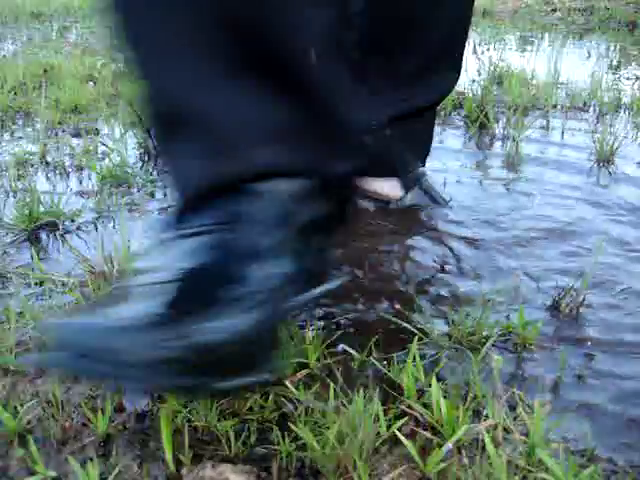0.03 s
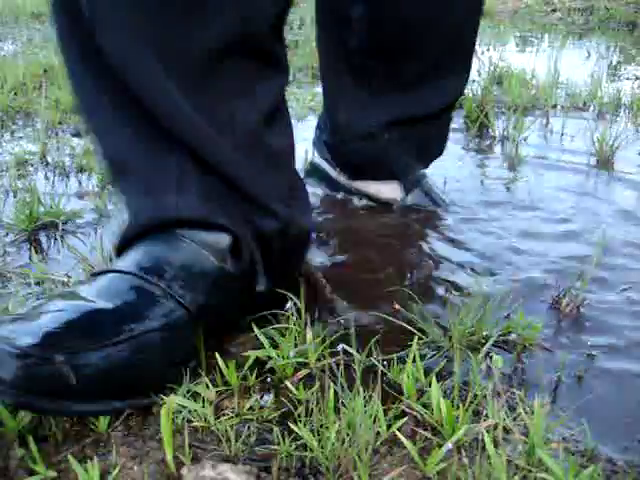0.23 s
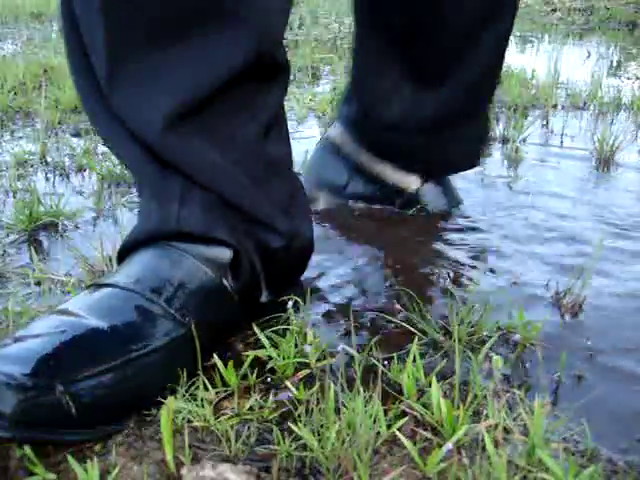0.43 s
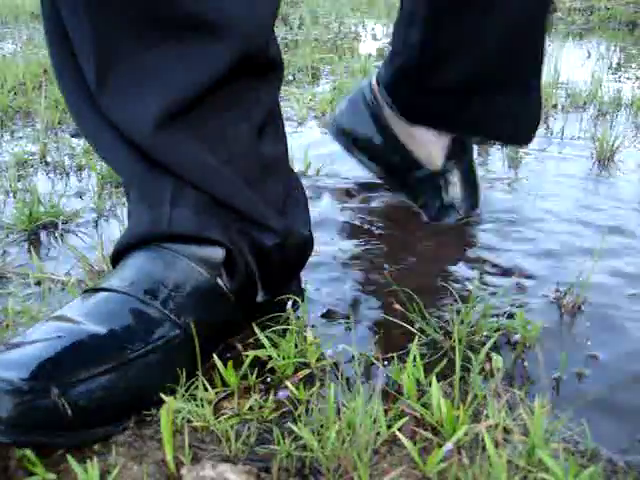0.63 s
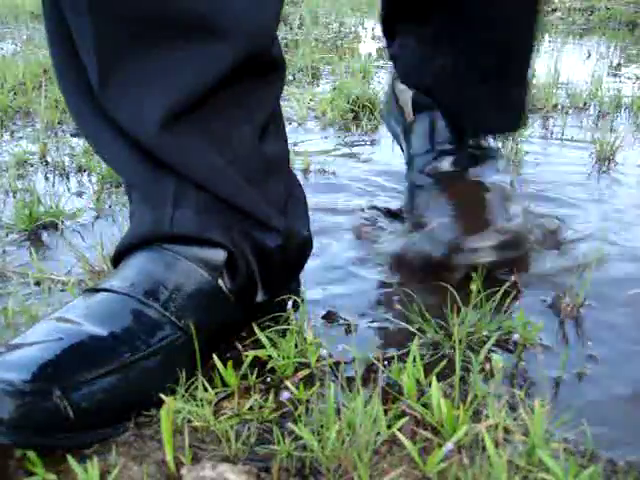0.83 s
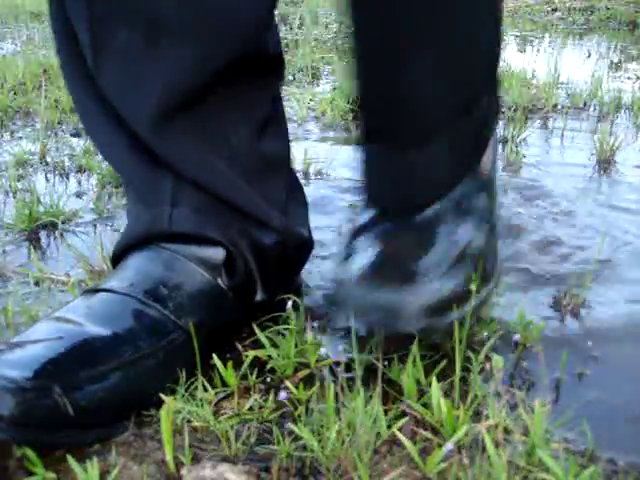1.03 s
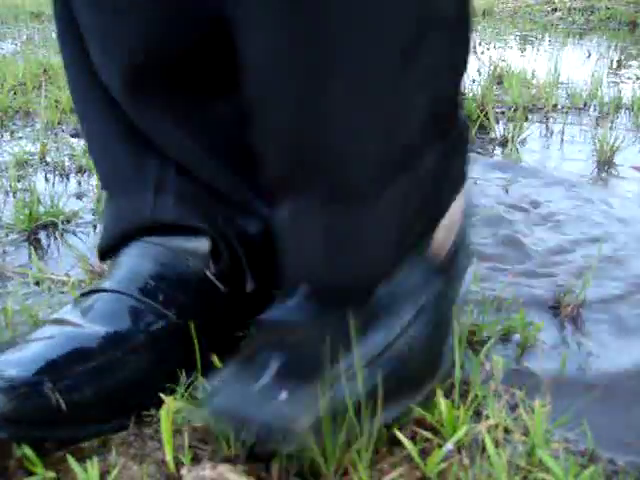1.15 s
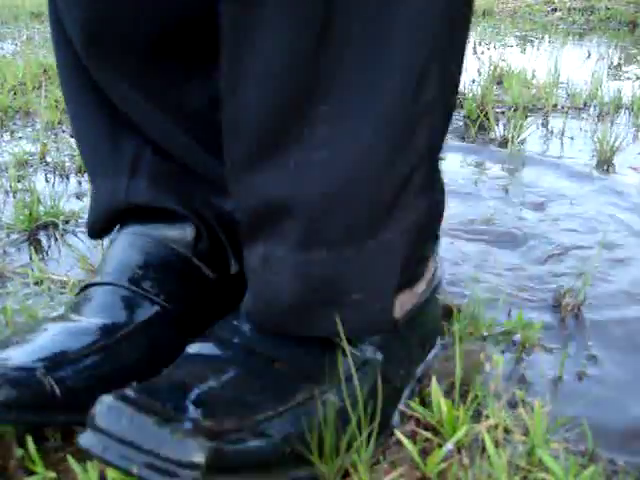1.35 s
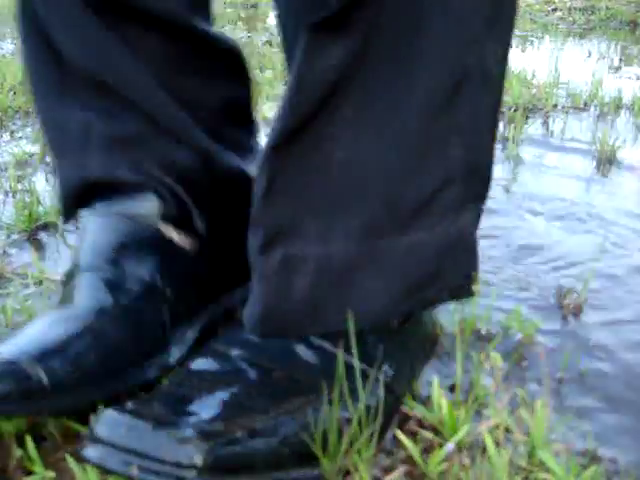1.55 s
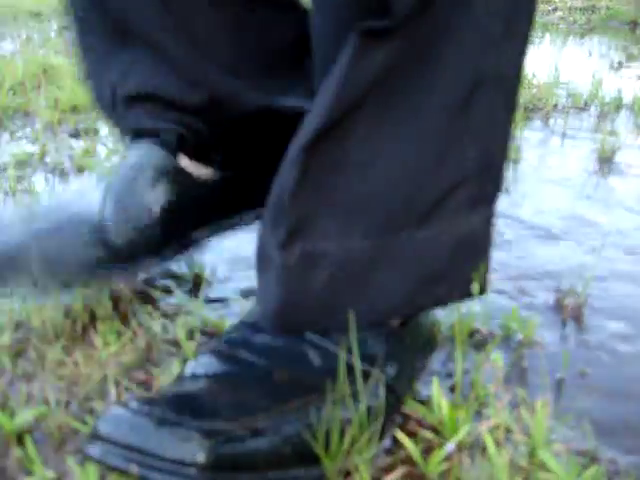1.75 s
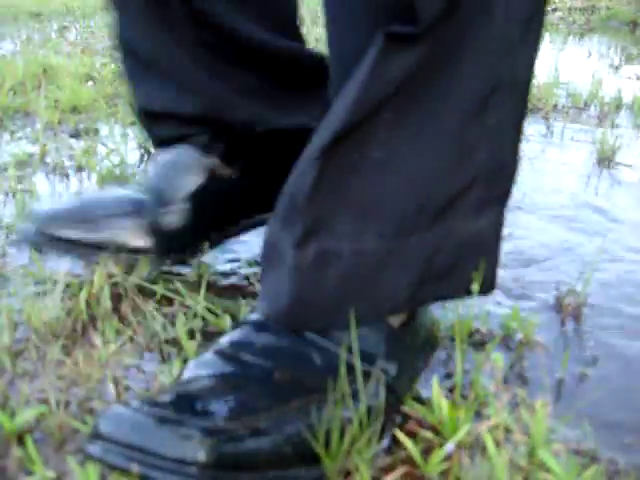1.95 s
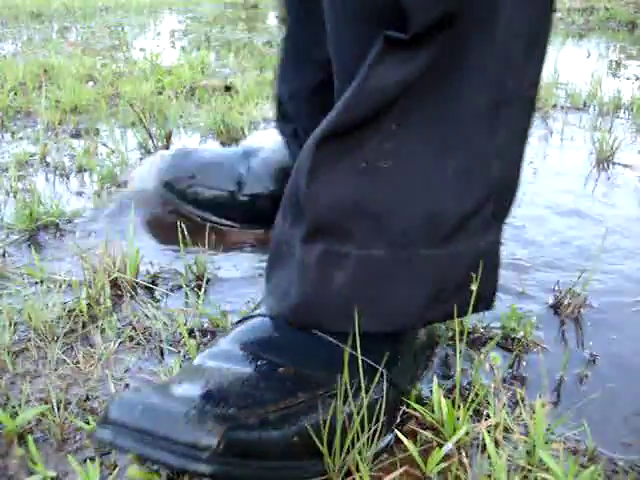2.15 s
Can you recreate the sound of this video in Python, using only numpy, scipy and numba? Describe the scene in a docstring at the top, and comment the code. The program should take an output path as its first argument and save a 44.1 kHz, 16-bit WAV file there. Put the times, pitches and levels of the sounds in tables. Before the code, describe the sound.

Shoes splash and squelch through a shallow puddle onto soggy grass, over faint hiss.

```python
"""Leather shoes wade out of a shallow muddy puddle onto soggy grass, close to the microphone.
Each push of a foot churns up tiny bubbles and spray, which ring as damped oscillators. Air pockets
resonate and pop, wet films and drops snap, feet thud in the turf and the hardest slaps bump the
microphone. Behind them a thin rising whistle, like a far bird, repeats over faint shrilling and hiss."""
import sys
import numpy as np
from scipy import signal
from scipy.fft import rfft, irfft
from scipy.io import wavfile
from scipy.ndimage import uniform_filter1d
from numba import njit

SR = 44100
rng = np.random.default_rng(int(sys.argv[2]) if len(sys.argv) > 2 else 0)


def generate_wav(sig):
    """Save sig (samples, or channels by samples) to the path in sys.argv[1] as 16-bit PCM at SR."""
    pcm = np.round(np.clip(np.atleast_2d(sig).T, -1, 1) * 32767).astype(np.int16)
    wavfile.write(sys.argv[1], SR, pcm)


N = 97020


def undb(db):
    """Amplitude grows tenfold for every 20 dB of level."""
    return 10 ** (np.asarray(db) / 20)


def unit_rms(x):
    """Dividing by the root mean square gives a signal unit power."""
    return x / np.sqrt(np.mean(x ** 2))


def add(out, start_s, x):
    """Superposition: a sound adds to those already present."""
    i = max(int(start_s * SR), 0)
    out[i:i + len(x)] += x[:max(N - i, 0)]


def wander(rate_hz):
    """Two moving averages low-pass white noise into a smooth drift of unit rms."""
    span = max(int(SR / rate_hz), 1)
    smoothed = uniform_filter1d(rng.standard_normal(N), span, mode="wrap")
    return unit_rms(uniform_filter1d(smoothed, span, mode="wrap"))


def colour(x, gain):
    """Zero-phase filtering: the spectrum is multiplied by a real gain(Hz)."""
    hz = np.maximum(np.fft.rfftfreq(len(x), 1 / SR), 1)
    return irfft(rfft(x) * gain(hz), len(x))


def reflections(x, decay_s):
    """Diffuse scattering: many weak echoes act as convolution with a decaying noise."""
    t = np.arange(SR // 4) / SR
    tail = rng.standard_normal(len(t)) * np.exp(-t / decay_s) * (1 - np.exp(-t / 0.0067))
    return signal.fftconvolve(x, tail / np.sqrt(np.sum(tail ** 2)))[:N]


def hiss():
    """Outdoor hiss is broadband noise, here densest in the high treble and flickering in level."""
    # Each row: frequency in Hz, relative spectral density in dB.
    spectrum = [(25, 10.5), (70, 1), (160, 6.5), (400, 5), (1000, -2.5), (2200, 1.5), (2900, -2.5),
                (3400, -25), (3900, -2), (5500, -6), (7200, -5.5), (7900, 8), (8700, -9.5), (9600, 15.5),
                (10200, -8)]
    hz, db = np.array(spectrum).T
    noise = colour(rng.standard_normal(N), lambda f: undb(np.interp(np.log(f), np.log(hz), db)))
    return unit_rms(noise) * undb(-48 + 2.77 * wander(rate_hz=24))


def shrill():
    """Narrow-band noise under random amplitude modulation is heard as far-off shrilling."""
    centre_hz, half_width_hz = 3440, 240
    band = colour(rng.standard_normal(N), lambda f: 1 / (1 + ((f - centre_hz) / half_width_hz) ** 2))
    return unit_rms(band) * undb(-61 + 5 * wander(rate_hz=8.2))


def whistles():
    """Frequency modulation: each far whistle is a sine that glides upward and wavers a little."""
    # Each row: start in seconds, length in seconds, first and last pitch in Hz, level in dB.
    glides = [(0.186, .10, 3930, 5160, -45.5), (1.071, 0.053, 4170, 5520, -39.5),
              (1.157, 0.036, 5350, 6220, -34), (1.854, 0.19, 4455, 6200, -41.5)]
    out = np.zeros(N)
    waver = 1 + 0.013 * wander(rate_hz=330)
    flutter = undb(1.9 * wander(rate_hz=120))
    for start, length, from_hz, to_hz, db in glides:
        progress = np.linspace(0, 1, int(length * SR))
        part = slice(int(start * SR), int(start * SR) + len(progress))
        hz = (from_hz + (to_hz - from_hz) * progress) * waver[part]
        envelope = np.sqrt(np.abs(np.sin(np.pi * progress))) * flutter[part]
        add(out, start, undb(db) * envelope * np.sin(2 * np.pi * np.cumsum(hz) / SR))
    return out


def turf_thuds():
    """A soft impact excites only low frequencies: a foot in turf gives a Gaussian pulse of bass."""
    # Each row: centre in seconds, frequency in Hz, peak in dB, half-length in seconds.
    footfalls = [(.005, 75, -45.5, .014), (.087, 70, -31, 0.015), (.14, 55, -50, 0.013),
                 (.235, 70, -38.5, 0.0092), (1.163, 55, -55, .014)]
    t = np.arange(N) / SR
    return sum(undb(db) * np.exp(-((t - centre) / half) ** 2) * np.cos(2 * np.pi * hz * (t - centre))
               for centre, hz, db, half in footfalls)


def microphone_bumps():
    """The hardest slaps send the microphone a pressure pulse: a fast push, then a shallow undershoot."""
    # Each row: start in seconds, level in dB.
    pulses = [(0.2662, -19), (0.2783, -23.5), (0.462, -19.5), (.784, -19.5), (1.34, -27.5), (1.348, -26),
              (1.633, -26)]
    rise_s, decay_s = 0.00057, 0.015
    out, t = np.zeros(N), np.arange(SR // 2) / SR
    pressure = (1 - np.exp(-t / rise_s)) * np.exp(-t / decay_s) * (1 - t / decay_s)
    for start, db in pulses:
        add(out, start, undb(db) * pressure)
    return out


def film_snaps():
    """A brief event has a broad spectrum: wet films and drops snap in short bursts of noise."""
    # Each row: time in seconds, peak in dB, band centre in Hz, bandwidth in octaves.
    cracks = [(0.224, -13, 2200, 1.5), (0.2325, -14, 2300, 2.2), (0.2665, -7.5, 6800, 2.2),
              (0.2787, -6, 5200, 1.9), (0.286, -23, 5000, 2), (0.2995, -22, 1500, 2.8),
              (.3052, -16.5, 3500, 1.6), (0.3745, -30, 7000, 1.5), (0.3839, -19, 5000, 0.87),
              (0.4186, -16, 3400, 2), (0.534, -18, 7000, 1.7), (0.566, -21, 7000, 1.6),
              (0.5753, -14, 7800, 0.61), (.580, -14.5, 6500, 0.81), (.683, -27, 5000, 1.3),
              (0.7285, -17, 4500, 0.89), (0.7318, -10, 7000, 2.5), (0.7831, -13, 3800, 1.5),
              (0.7883, -12, 4500, 3.6), (0.9286, -14, 4500, 0.93), (0.935, -16, 5000, 2.1),
              (.946, -21, 4800, 0.79), (.952, -24, 7000, 1.5), (1.0497, -23, 3500, 2.5),
              (1.279, -23.5, 3560, 1.6), (1.3397, -6.5, 4000, 0.67), (1.344, -9, 1100, 5.7),
              (1.3496, -11, 8200, 0.27), (1.3538, -6, 2090, 2.6), (1.4639, -16.5, 2500, 1.7),
              (1.4717, -17, 4800, 2.2), (1.494, -23.5, 2600, 0.5), (1.6167, -22, 6100, 0.35),
              (1.6322, -15.5, 3400, 2.3), (1.656, -36, 4700, 1.1), (1.691, -32, 2000, 2.5)]
    out, t = np.zeros(N), np.arange(SR // 20) / SR
    decay_s, lead_s = 0.00095, t[len(t) // 2]  # the lead leaves room for the filter to spread the burst
    for at, db, hz, octaves in cracks:
        burst = rng.standard_normal(len(t)) * (t >= lead_s) * np.exp(-np.abs(t - lead_s) / decay_s)
        band = colour(burst, lambda f: 1 / (1 + (2 * np.log2(f / hz) / octaves) ** 2))
        crack = colour(band, lambda f: 1 / np.sqrt(1 + (hz / f / 10) ** 2))  # bass roll-off
        add(out, at - lead_s, undb(db) * crack / np.abs(crack).max())
    return out


def pocket_pops():
    """Air pockets resonate until they burst, most of them rising in pitch as they surface."""
    # Each row: start in seconds, pitch in Hz, level in dB, decay time in seconds,
    # glide per second as a share of the starting pitch.
    pockets = [(.374, 439, -27, 0.028, 4.5), (0.415, 905, -14.5, .004, -11),
               (0.424, 251.6, -19.5, 0.021, 1.5), (.437, 451, -17, .012, 4.5), (.590, 600, -2, 0.001, 7),
               (.608, 603, -20, 0.0017, 5), (.671, 553, -28, 0.0055, -5), (0.7296, 500, -15, 0.0068, 0),
               (0.783, 4670, -14, .002, -7), (0.7843, 1495, -4, 0.0018, -20),
               (0.787, 1435, -4.5, 0.0024, 1), (0.7887, 1420, -8, 0.0017, 23), (0.81, 482, -28, 0.028, 4.5),
               (.812, 3585, -38, 0.021, 3), (.818, 760, -27.5, 0.023, 12.5), (.866, 578, -32, 0.02, 3),
               (.901, 558, -28, 0.0097, 12), (.922, 913, -25.5, 0.0076, -0.5),
               (0.947, 1574, -29, 0.0058, 5.5), (0.966, 1470, -28, .007, 13.5),
               (.979, 2120, -30.5, 0.0057, 7), (1.049, 1350, -26.5, 0.0057, 4),
               (1.0615, 850, -23.5, 0.012, 8.5), (1.082, 1200, -29.5, 0.0078, 35.5),
               (1.109, 1013, -34.5, 0.007, 7), (1.159, 1210, -15, 0.001, 9), (1.198, 880, -12.5, 0.002, -1),
               (1.214, 1120, -12, 0.0025, 12), (1.2185, 840, -13, 0.0046, -0.5),
               (1.218, 1360, -19, 0.0061, -0.5), (1.279, 3350, -16, 0.0026, 12),
               (1.333, 1564, -23.5, 0.0034, 5), (1.3391, 2150, -8.5, 0.0015, 18),
               (1.367, 3400, -20.5, 0.0023, 0), (1.437, 1410, -16, 0.0012, 24),
               (1.454, 2380, -29, 0.0045, 6), (1.471, 1190, -29.5, 0.018, 19.5),
               (1.511, 914, -35, 0.0081, 20), (1.591, 550, -19.5, 0.0016, 0),
               (1.6308, 2533, -3.5, 0.0024, 10), (1.6305, 5040, -12.5, 0.0022, 4),
               (1.631, 4260, -8, 0.0012, 4), (1.632, 2140, -4, 0.0016, 15), (1.6335, 1500, 2.5, 0.0012, -1),
               (1.634, 1277, -24.5, 0.0077, -1), (1.639, 2020, -19, 0.0034, -5)]
    attack_cycles, life_in_decays = 0.9, 2.67
    out, t = np.zeros(N), np.arange(SR // 10) / SR
    for start, hz, db, decay, glide in pockets:
        attack = 1 - np.exp(-(t * hz / attack_cycles) ** 2)
        fade = np.exp(-t / decay - (t / decay / life_in_decays) ** 4)
        tone = np.sin(2 * np.pi * hz * t * (1 + glide * t / 2))
        add(out, start, undb(db) * attack * fade * tone)
    return out


@njit
def ring_bubbles(start, hz, decay_cycles, amplitude):
    """Each bubble is a damped oscillator whose pitch rises as it dies away."""
    rise_per_decay = 0.12
    out = np.zeros(N)
    for k in range(len(start)):
        decay_samples = decay_cycles[k] * SR / hz[k]
        for i in range(min(int(6 * decay_samples), N - start[k])):
            age = i / decay_samples
            phase = 2 * np.pi * hz[k] / SR * i * (1 + rise_per_decay * age / 2)
            out[start[k] + i] += amplitude[k] * np.exp(-age) * np.sin(phase)
    return out


def bubble_stream(low_hz, high_hz, ring_scale, spread_db, count):
    """Many bubbles of random pitch, damping and strength merge into a band of noise."""
    when, pitch, length, strength = rng.random((count, 4)).T
    hz = low_hz * (high_hz / low_hz) ** pitch
    decay_cycles = ring_scale * (0.36 + length) / 2
    level_db = spread_db * np.minimum(-np.log(1 - strength), 4.2)  # capped exponential distribution
    stream = ring_bubbles((when * N).astype(np.int64), hz, decay_cycles, undb(level_db))
    stream = colour(stream, lambda f: 1 / np.sqrt(1 + (0.76 * low_hz / f) ** 6))  # high-pass
    local_power = uniform_filter1d(stream ** 2, int(0.022 * SR))
    even_flow = stream / np.sqrt(local_power + 1e-9)
    clumping = undb(1.5 * wander(rate_hz=170))
    return even_flow * clumping


def splashes():
    """Each push of a foot drives bubbles of four sizes; incoherent splashes add in power."""
    # Each row: crest time, swell and fade in seconds, then gurgle, squelch, spray and fizz in dB.
    pushes = [(.02, .04, 0.082, -60.5, -58, -49, -54.5), (.19, 0.024, 0.09, -57, -48.5, -50, -51.5),
              (.223, 0.0026, .016, -59, -33.5, -36.5, -41), (0.235, .002, 0.019, -49, -35, -32, -46),
              (.283, 0.013, 0.078, -41.5, -36, -37.5, -42.5), (0.373, 0.0027, 0.012, -36, -35, -48, -32.5),
              (0.399, 0.0039, 0.042, -29, -32, -37.5, -62), (0.418, 0.0023, .014, -28, -24.5, -28.5, -55),
              (0.442, 0.013, 0.017, -24.5, -25, -25.5, -37), (0.49, 0.018, 0.012, -52, -31.5, -35.5, -25.5),
              (.530, 0.059, 0.076, -43, -41.5, -42.5, -64), (0.565, 0.0013, 0.0065, -35, -45, -49, -33),
              (0.58, 0.0043, .014, -31.5, -38, -50, -49), (.610, 0.0027, 0.005, -29, -43, -64, -44),
              (.645, 0.015, .03, -52, -49.5, -63, -66), (0.671, 0.0011, 0.015, -39, -40.5, -52, -54),
              (0.707, 0.012, 0.02, -37.5, -45, -48, -69), (0.735, 0.011, 0.012, -28.5, -40, -42.5, -61),
              (.778, 0.0014, 0.025, -38, -28, -41, -38), (0.813, 0.0039, 0.022, -63, -31.5, -34.5, -41.5),
              (0.853, 0.014, 0.038, -57, -38.5, -45.5, -59), (.902, .002, 0.015, -67, -34, -53, -55),
              (.955, 0.018, 0.072, -56, -41, -39.5, -66), (1.051, 0.0011, 0.015, -66, -40, -36, -45),
              (1.124, .012, 0.069, -72, -47.5, -42.5, -58), (1.2, 0.0069, 0.021, -48, -31, -39.5, -61),
              (1.219, 0.0024, 0.018, -46, -46, -37.5, -40), (1.297, 0.016, 0.035, -45.5, -45, -38.5, -44),
              (1.348, 0.012, 0.03, -35.5, -29, -30, -45), (1.382, .010, 0.0084, -27.5, -40, -46, -40),
              (1.453, 0.02, 0.013, -52, -39.5, -40.5, -48), (1.474, .006, 0.033, -51, -37.5, -35.5, -64),
              (1.602, 0.039, 0.038, -49, -44, -44.5, -47.5), (1.631, 0.0025, 0.0059, -46, -27, -29, -40),
              (1.705, 0.039, 0.079, -44, -39, -40.5, -46), (1.836, 0.052, 0.061, -72, -50, -44.5, -40),
              (1.960, 0.0078, 0.0092, -44, -51.5, -69, -53),
              (2.03, .015, 0.062, -56.5, -52.5, -53.5, -45.5),
              (2.089, 0.0014, 0.02, -52.5, -53, -44, -41.5), (2.189, .012, 0.01, -50.5, -53, -48, -55)]
    gurgle = bubble_stream(low_hz=296, high_hz=740, ring_scale=1.36, spread_db=3.6, count=1800)
    squelch = bubble_stream(low_hz=747, high_hz=2250, ring_scale=1.7, spread_db=3.8, count=4500)
    spray = bubble_stream(low_hz=2520, high_hz=5500, ring_scale=4.7, spread_db=4.4, count=8000)
    fizz = bubble_stream(low_hz=4870, high_hz=8000, ring_scale=2.6, spread_db=3.7, count=8000)
    power, t = np.zeros((4, N)), np.arange(N) / SR
    for crest, swell, fade, *levels_db in pushes:
        # Gaussian swell up to the crest, exponential fade after it.
        exponent = np.where(t < crest, ((t - crest) / swell) ** 2 / 2, (t - crest) / fade)
        envelope = np.exp(-exponent.clip(0, 20))
        power += np.outer(undb(levels_db) ** 2, envelope ** 2)
    return (np.array([gurgle, squelch, spray, fizz]) * np.sqrt(power)).sum(axis=0)


def scene():
    """Direct sound, reflections and background superpose at one microphone."""
    water = splashes() + pocket_pops() + film_snaps()
    far = whistles()
    water += undb(-24) * reflections(water, decay_s=0.024)  # off legs, water and grass
    far += undb(-9) * reflections(far, decay_s=0.012)
    return (water + turf_thuds() + microphone_bumps() + far + shrill() + hiss())[None]


def record(dry):
    """Saturation rounds the hardest peaks, and a steep low-pass filter limits the bandwidth."""
    ceiling, cutoff_hz = 0.9, 10050
    low_pass = signal.ellip(10, 0.2, 70, cutoff_hz, fs=SR, output="sos")
    return signal.sosfilt(low_pass, ceiling * np.tanh(dry / ceiling))


dry = scene()
out = record(dry)
generate_wav(out)
```